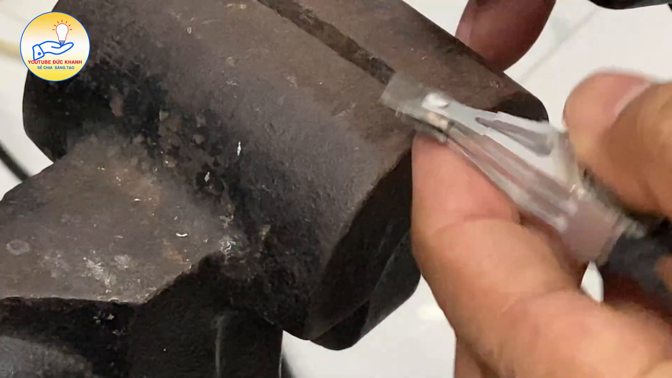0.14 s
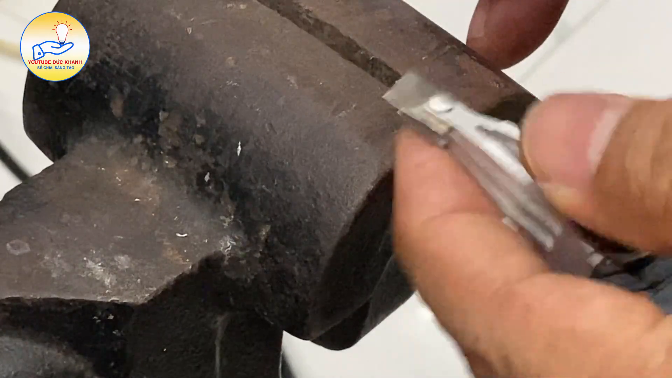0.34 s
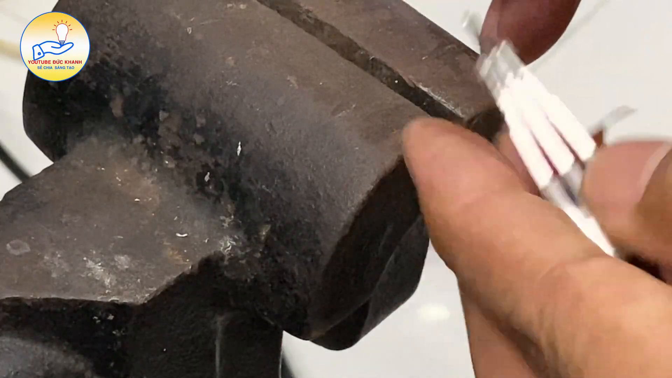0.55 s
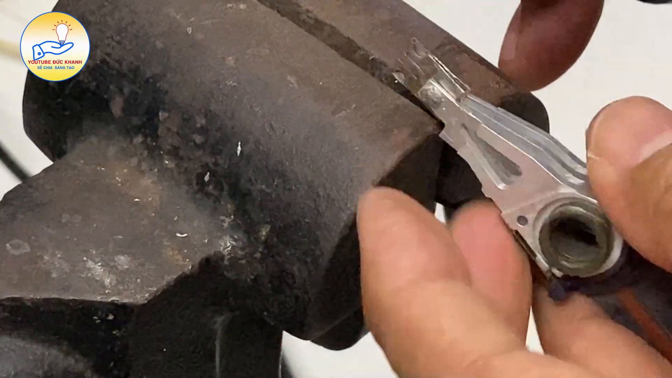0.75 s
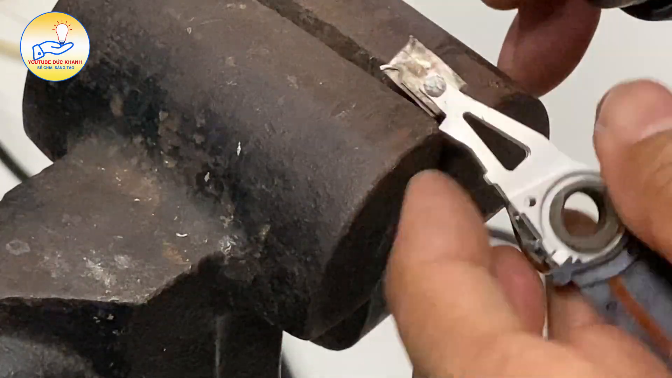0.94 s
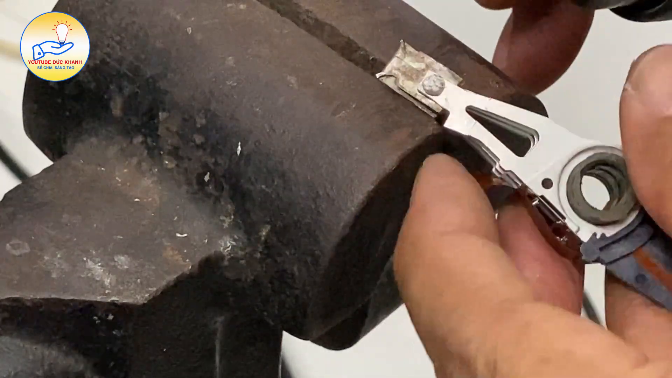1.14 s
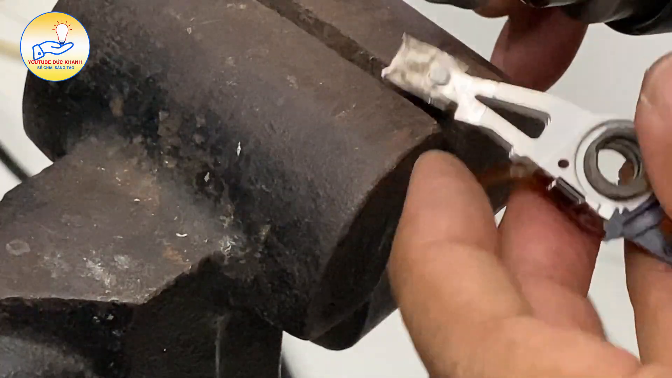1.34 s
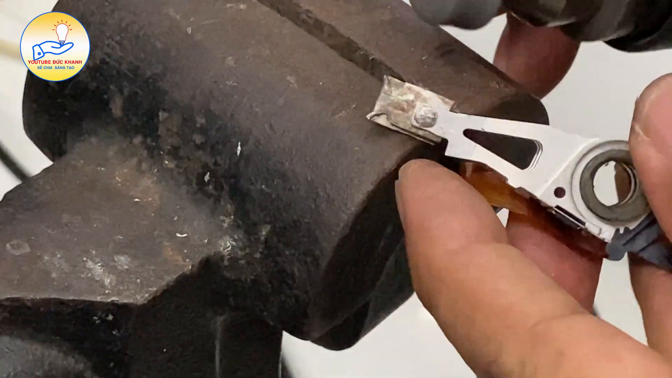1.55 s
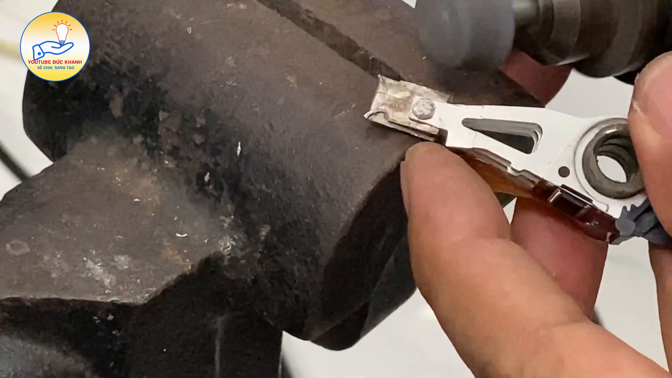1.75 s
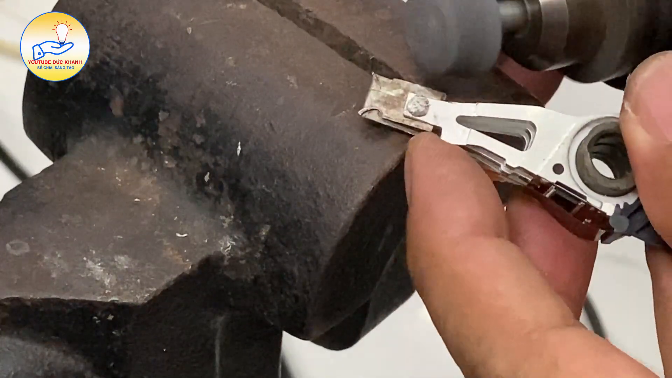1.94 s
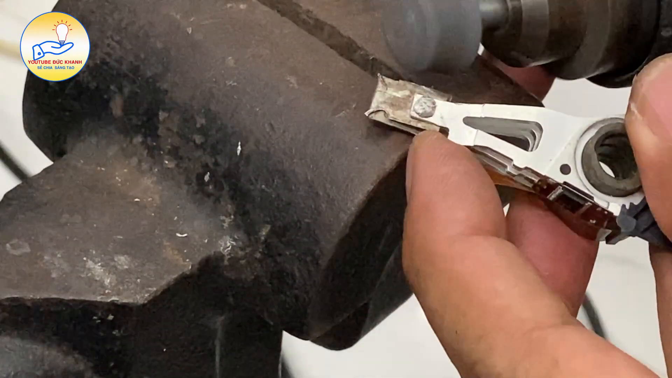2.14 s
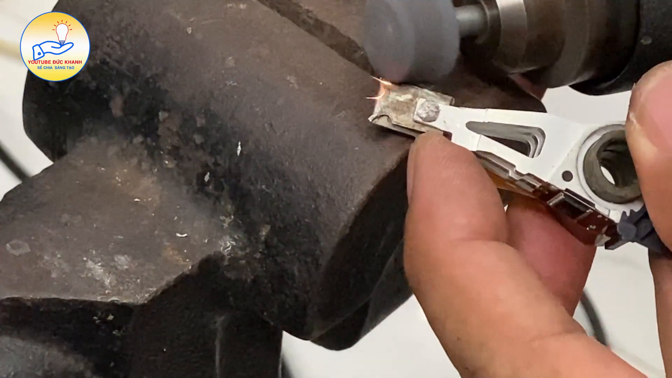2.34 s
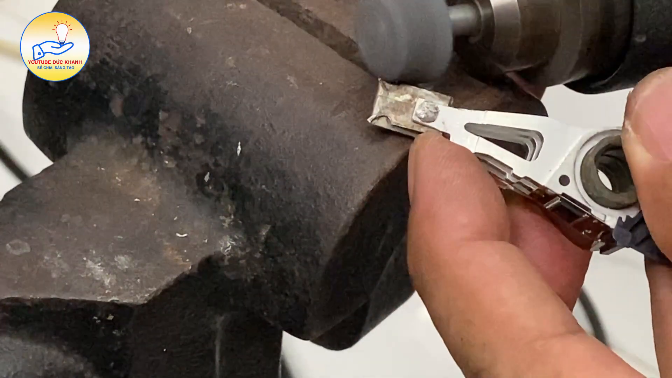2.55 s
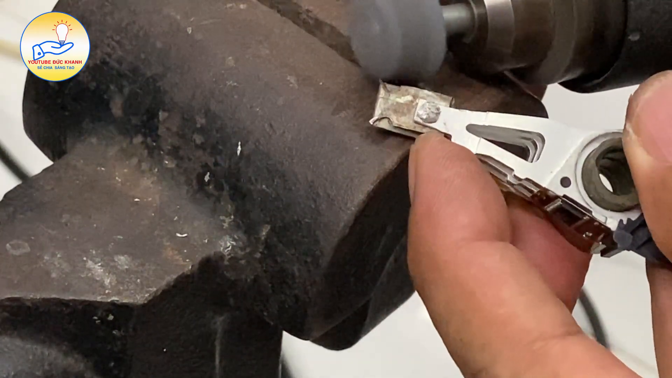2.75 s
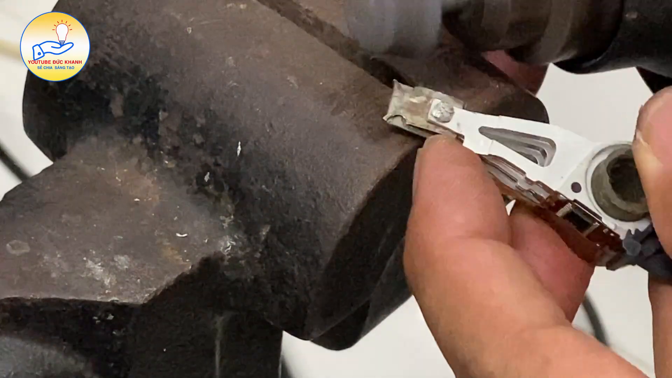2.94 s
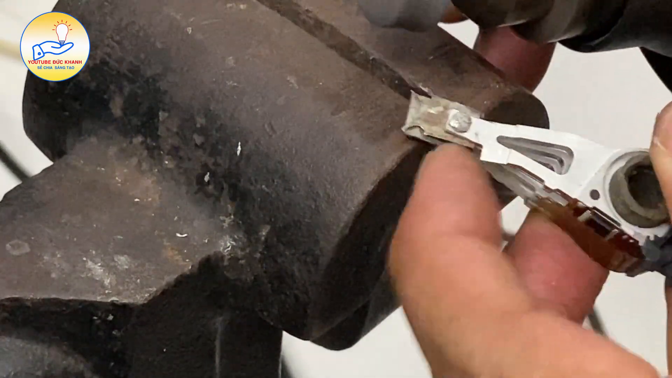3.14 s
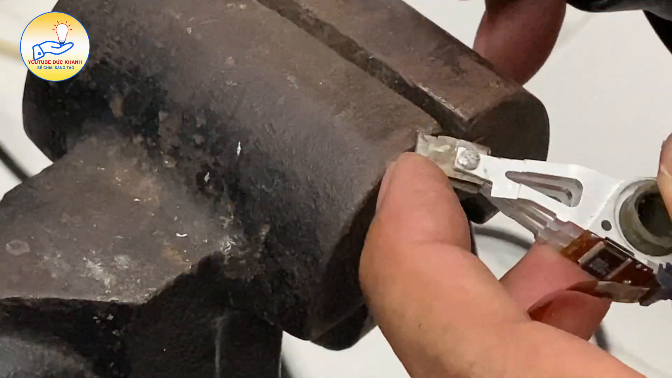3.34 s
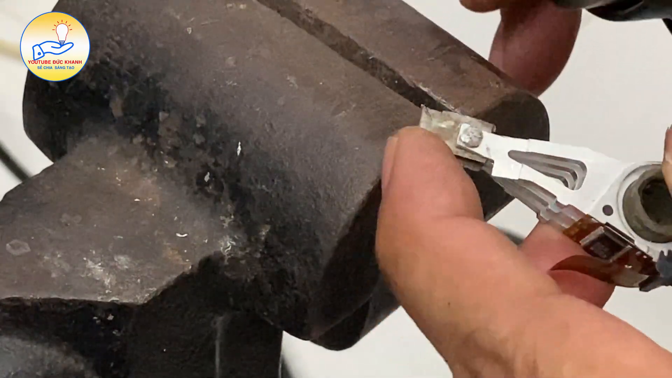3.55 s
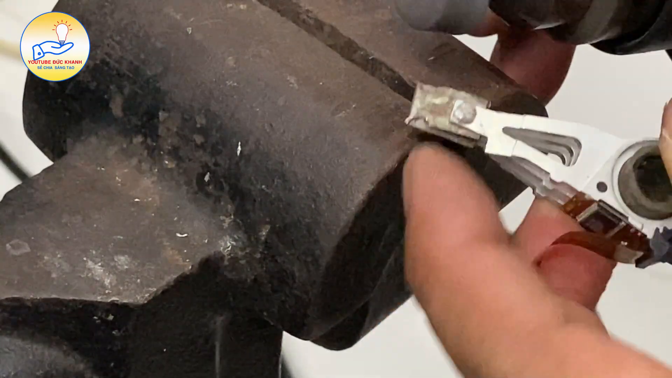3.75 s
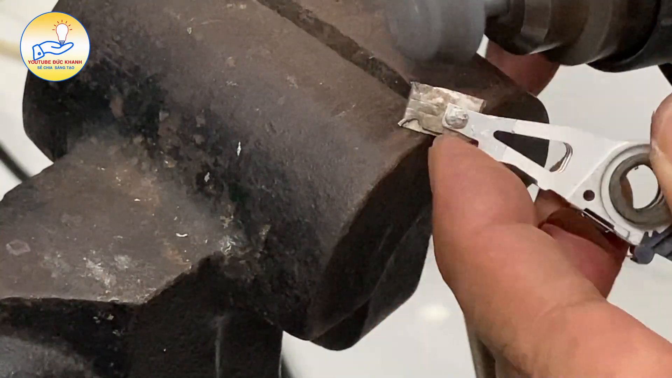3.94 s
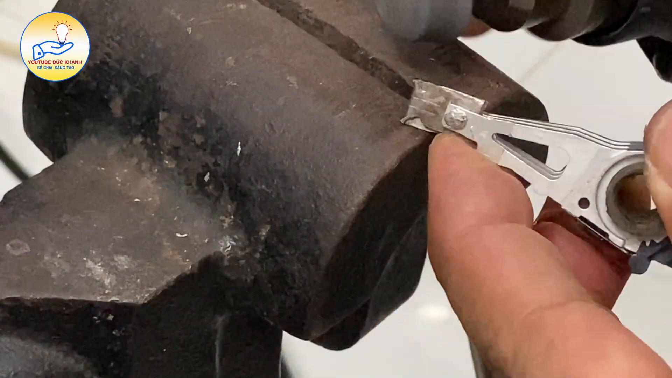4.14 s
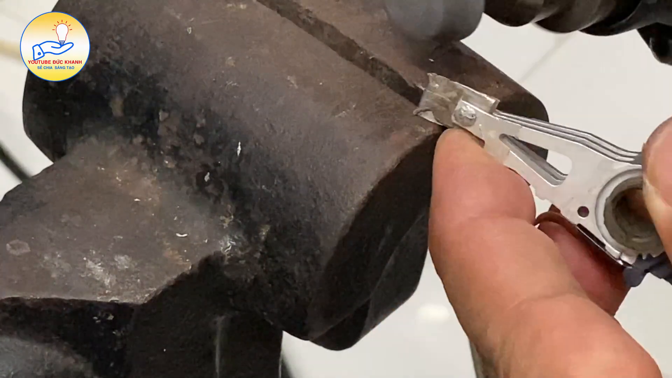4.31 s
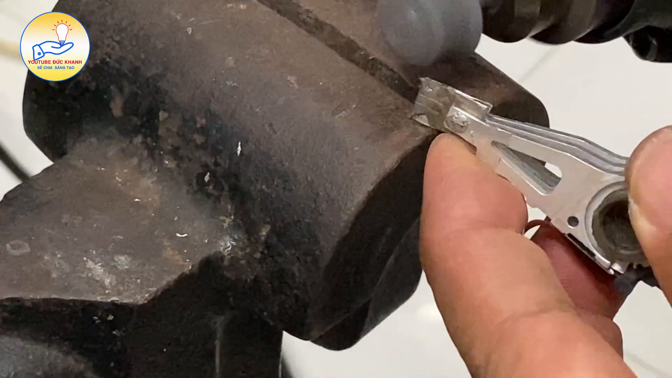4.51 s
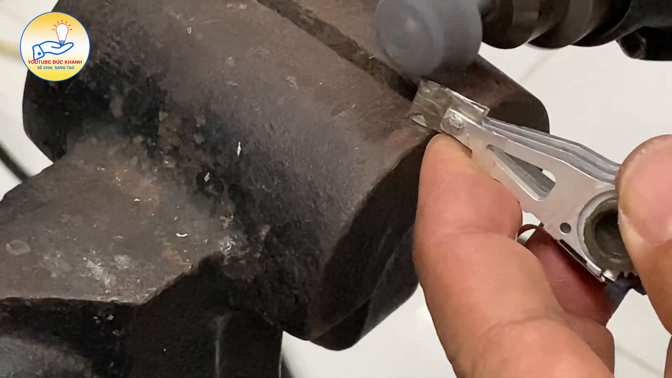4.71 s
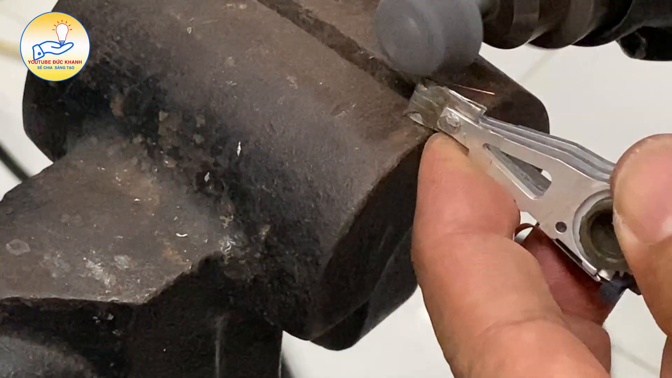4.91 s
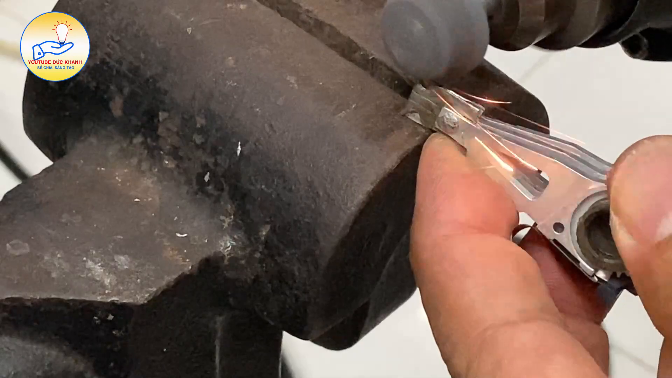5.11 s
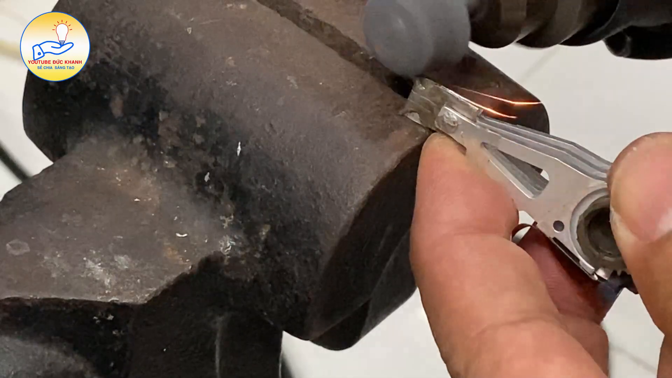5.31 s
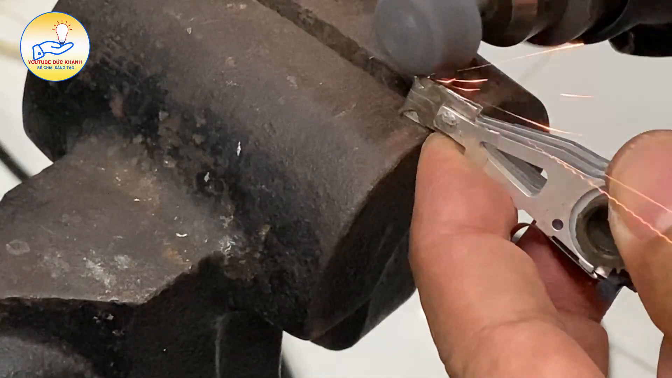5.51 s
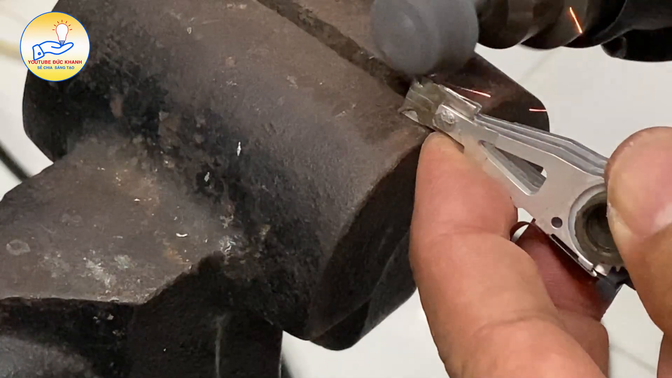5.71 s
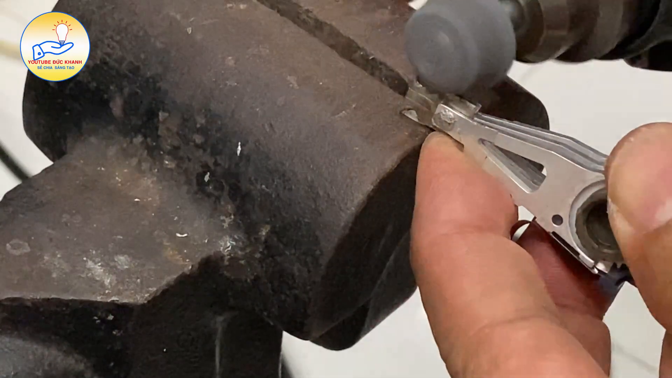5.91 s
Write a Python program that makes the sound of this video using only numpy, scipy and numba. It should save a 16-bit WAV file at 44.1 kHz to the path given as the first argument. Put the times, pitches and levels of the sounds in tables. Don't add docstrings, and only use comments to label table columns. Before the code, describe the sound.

A dying metallic scrape gives way to the rising, throbbing whine of a small mains rotary grinder with rushing fan air. Soft low bench thuds come near two seconds as light dabs of the stone chirp and rasp on thin metal. After a pause of bare motor, harder ringing dabs follow in quick succession. Close phone-like microphone, small workshop, short room tail.

```python
import sys
import numpy as np
from scipy import signal
from scipy.fft import rfft, irfft
from scipy.io import wavfile
from scipy.ndimage import uniform_filter1d, map_coordinates
from numba import njit

SR = 44100
rng = np.random.default_rng(int(sys.argv[2]) if len(sys.argv) > 2 else 0)


def put_to_file(sound):
    columns = np.atleast_2d(sound).T
    safe = np.clip(columns, -1, 1)
    whole_steps = np.round(safe * 32767)
    wavfile.write(sys.argv[1], SR, whole_steps.astype(np.int16))


def elevation(decibels):
    levels = np.asarray(decibels, float)
    return 10 ** (levels / 20)


N = 263277
TIME = np.arange(N) / SR
SLOTS = 12
PULL_HZ, PULL_PEAK_S = 100.2, 0.0083
KNOCK_FADE_S = 0.0068
REGRIP_S = [
    1.0,
    4.0,
    5.25,
    5.49,
]


def unit(x):
    return x / np.sqrt(np.mean(x ** 2))


def curve(table):
    seconds, values = np.transpose(table)
    return np.interp(TIME, seconds, values)


@njit
def svf(x, hz, width):
    y, b, l = np.empty(len(x)), 0., 0.
    for i in range(len(x)):
        g = np.tan(np.pi * hz[i] / SR)
        k = width[i] / hz[i]
        v = (b + g * (x[i] - l)) / (1 + g * (g + k))
        b = 2 * v - b
        l = l + 2 * g * v
        y[i] = k * v
    return y


def band(x, hz, width):
    return svf(x, np.full(N, 1. * hz), np.full(N, 1. * width))


def lift(x, modes):
    return x + sum((elevation(db) - 1) * band(x, hz, width) for hz, width, db in modes)


def walk(rate):
    hold = int(SR / rate)
    held = np.repeat(rng.standard_normal(N // hold + 1), hold)
    return 1.3 * uniform_filter1d(uniform_filter1d(held, hold), hold)[:N]


def air(air_db):
    # pitch_hz, level_db (per Hz)
    colour_points = [(18, -56), (30, -15.5), (256, -13.5), (316, -11), (360, -12), (506, -14), (790, -10.5),
                     (974, -1.5), (1170, -12.5), (1520, -2.5), (2140, -6.5), (3800, -7.5), (5060, -8.5),
                     (11700, -11), (15600, -14)]
    # pitch_hz, width_hz, level_db (over the air)
    housing = [(1007, 163, 7.5), (1417, 374, 8), (2357, 37, 6.5), (3780, 1080, 8.5)]
    hz = np.maximum(np.arange(N // 2 + 1) * SR / N, 1)
    point_hz, point_db = np.array(colour_points).T
    colour = elevation(np.interp(np.log(hz), np.log(point_hz), point_db))
    rush = irfft(rfft(rng.standard_normal(N)) * colour, N)
    rush = lift(rush, housing)
    shake = 1 + 0.038 * np.cos(2 * np.pi * PULL_HZ * (TIME - PULL_PEAK_S - .002))
    return unit(rush) * shake * elevation(air_db + 4.5 + 0.89 * walk(9.9))


def bumps():
    # start_s, level_db, pitch_hz, length_s
    thuds = [
        (1.687, -57, 70.0, 0.15),
        (1.868, -36, 83, 0.124),
        (1.983, -44, 64.6, 0.112),
        (2.277, -47, 89, 0.104),
        (2.43, -56.5, 84, 0.164),
        (5.127, -49.5, 87, 0.198),
    ]
    out = np.zeros(N)
    for start, db, hz, length in thuds:
        t = np.clip(TIME - start, 0, None) / length
        swell = 8 * t * np.exp(1 - 8 * t)
        out += elevation(db) * swell * np.sin(2 * np.pi * hz * length * t)
    return out


def slot_whine(turn, hz, near_db):
    # multiple of the pull rate, level_db
    throb = [
        (-2, -6),
        (-1, -1),
        (1, -1),
        (2, -7),
    ]
    tilt_s, tilt_takes_s, tilt_db = 5.5, .1, -7
    slot_db = -31.5 + 0.91 * near_db
    slot_db = slot_db + tilt_db / (1 + np.exp((tilt_s - TIME) / tilt_takes_s))
    below_db = slot_db - 9 - 2.5 * np.clip(hz - 318, 0, None) + walk(2.6)
    above_db = slot_db - 18.5 + 1.3 * np.abs(hz - 311)
    pull = 2 * np.pi * PULL_HZ * (TIME - PULL_PEAK_S)
    beat = elevation(slot_db)
    for k, db in throb:
        side_db = below_db if k < 0 else above_db
        beat = beat + elevation(db + side_db) * np.exp(1j * k * pull)
    return elevation(.5 * walk(12)) * np.real(beat * np.exp(2j * np.pi * SLOTS * turn))


def shaft_tones(turn, hz, near_db):
    # multiple of the shaft speed, level_db
    tones = [(1, -20), (2, -30), (3, -19), (6, -26), (11, -15), (13, -24), (14, -21), (15, -18), (16, -14),
             (19, -26), (20, -18), (21, -21), (22, -24), (23, -24), (24, -9), (25, -20), (26, -25),
             (27, -23), (28, -15), (29, -16), (30, -22), (31, -26), (32, -21), (34, -23), (35, -23),
             (36, -13), (37, -18), (39, -25), (40, -23), (43, -26), (44, -26), (48, -21)]
    rise = {1: 0.09, 16: -0.26, 24: 0.32, 28: 0.2, 36: 0.08, 48: -0.43}
    usual_hz = 316
    out = 0
    for k, db in tones:
        waver_db = min(k / 8, 1.4) * walk(6) + rise.get(k, 0) * (hz - usual_hz)
        out = out + elevation(db + waver_db) * np.cos(2 * np.pi * (k * turn + rng.random()))
    return elevation(-32 + near_db) * out


def whine(turn, hz, near_db):
    return np.sqrt(2) * (slot_whine(turn, hz, near_db) + shaft_tones(turn, hz, near_db))


def stone(turn):
    cells = 140
    fresh = rng.standard_normal((int(turn[-1]) + 2, cells))
    rim = signal.lfilter([1], [1, -.94], fresh, axis=0)
    angle = turn % 1
    bite = np.exp(-angle / .4)
    held = map_coordinates(rim, [np.floor(turn), angle * (cells - 1)], order=3)
    snap = 0
    for k in range(18, 51):
        snap = snap - elevation(3.0 * walk(25)) * np.cos(2 * np.pi * (k * turn + .15 * walk(3)))
    held = unit(unit(bite * held) + 1.1 * unit(snap))
    loose = unit(bite * rng.standard_normal(N))
    return held, loose


def dabs(hz):
    # start_s, length_s, ring_db, main_mode_hz, grit_db
    early_dabs = [(-.012, 0.028, -18.5, 3600, -35.5), (2.249, .022, -25, 3440, -32.5),
                  (2.336, 0.029, -15.5, 3610, -32), (2.363, 0.068, -25.5, 3440, -29),
                  (2.423, 0.051, -21.5, 3640, -27.5), (2.468, 0.11, -22.5, 3700, -29.5),
                  (2.579, 0.061, -18.5, 3920, -27.5), (2.647, 0.029, -28, 3500, -29),
                  (2.676, 0.057, -20.5, 3900, -26), (2.741, 0.052, -32, 3780, -29),
                  (2.796, 0.032, -26, 3780, -32.5)]
    # start_s, length_s, ring_db, main_mode_hz, grit_db
    late_dabs = [(4.637, 0.021, -24.5, 3520, -30), (4.695, 0.042, -28.5, 3520, -35),
                 (4.747, .08, -39.5, 3520, -60), (4.914, 0.0095, -25, 3520, -32),
                 (4.925, 0.12, -25, 3510, -38.5), (5.043, 0.095, -28.5, 3560, -39),
                 (5.13, 0.086, -18.5, 3540, -35.5), (5.214, .04, -30, 3470, -36),
                 (5.255, 0.037, -22.5, 3470, -39), (5.298, 0.085, -27.5, 3480, -40),
                 (5.377, .11, -21.5, 3560, -34.5), (5.489, 0.052, -16, 3614, -35),
                 (5.563, 0.016, -16.5, 3620, -45), (5.591, 0.023, -25, 3690, -39),
                 (5.669, 0.048, -23, 3640, -35.5), (5.73, 0.026, -29, 3660, -43),
                 (5.748, 0.085, -21.5, 3600, -47), (5.843, 0.033, -19.5, 3670, -33),
                 (5.882, 0.028, -24, 3630, -38), (5.909, .03, -20, 3650, -51),
                 (5.95, 0.036, -33, 3650, -55)]
    lifted_s = .058
    land_s, swell, release_s = .006, 0.37, 0.013
    mode_width_hz = 240
    multiples = np.arange(SLOTS - 1, SLOTS + 2)[:, None]
    grit_share = np.array([[0.25], [0.66], [1]])
    main, scrape, knock, ended = np.zeros((3, N)), np.zeros((3, N)), np.zeros(N), 0
    for start, length, ring_db, mode_hz, grit_db in early_dabs + late_dabs:
        lands = start - ended > lifted_s or start < 0
        ended = start + length
        t = TIME - start
        rise = np.clip(t / (land_s if lands else swell * length), 0, 1)
        shape = rise * np.exp(-np.clip(t - length, 0, None) / release_s)
        detune = 2 * (multiples * hz - mode_hz) / mode_width_hz
        main += elevation(ring_db) * shape / (1 + detune ** 2)
        scrape += elevation(ring_db + (grit_db - ring_db) * grit_share) * shape
        knock += lands * elevation(grit_db) * rise * np.exp(-np.clip(t, 0, None) / KNOCK_FADE_S)
    return main, scrape, knock


def chatter():
    # start_s, length_s, level_db
    bouts = [
        (4.917, 0.028, -20),
        (5.113, 0.083, -33),
    ]
    bounce = np.cumsum(88 * (1 + 0.24 * walk(60))) / SR % 1
    gate = 2 * uniform_filter1d(np.exp(-bounce / 0.32), size=60)
    size = 0
    for start, length, db in bouts:
        progress = np.clip((TIME - start) / length, 0, 1)
        size = size + elevation(db) * np.sqrt(np.sin(np.pi * progress).clip(0))
    return gate * size


def ring(turn, loose, main, scrape, stray):
    # multiple of the turn, then level_db in each of five grips
    grips = [(3, -25, -25, -25, -18, -14), (4, -25, -25, -25, -18, -14), (5, -25, -22, -16, -16, -18),
             (6, -18, -19, -14, -17, -20), (7, -4, -17, -12, -15, -8), (8, -9, -16, -20, -19, -23),
             (9, -18, -9, -15, -9, -17), (10, -13, -14, -25, -12, -20), (13, -11, -4, -2, 0, -6),
             (14, -8, -7, -4, -7, -1), (15, -8, -8, -9, -13, -12), (16, -13, -10, -11, -13, -13),
             (17, -15, -9, -10, -7, -7), (18, -16, -13, -11, -7, -17), (19, -21, -8, -17, -15, -15)]
    main_tones = 0
    for k, size in enumerate(main, start=SLOTS - 1):
        main_tones = main_tones + size * elevation(walk(60)) * np.sin(2 * np.pi * k * turn)
    grip = np.searchsorted(REGRIP_S, TIME)
    other_tones = 0
    for k, *dbs in grips:
        level = elevation(np.array(dbs)[grip] + 3.3 * walk(28))
        phase = k * turn + rng.random() + .06 * walk(70)
        other_tones = other_tones + level * np.sin(2 * np.pi * phase)
    mode = unit(band(band(loose, 3620, 190), 3620, 190))
    around = unit(band(band(loose, 3700, 3000), 3700, 3000))
    clang = mode + elevation(-7) * around
    return np.sqrt(2) * (main_tones + scrape * other_tones) + stray * clang


def landing_ding(loose, knock):
    ding = signal.lfilter([1 / (KNOCK_FADE_S * SR)], [1, -np.exp(-1 / (.035 * SR))], knock)
    return elevation(3) * ding * unit(band(loose, 2100, 60))


def grit_rasp(held, loose, sizes, knock):
    # pitch_hz, width_hz, level_db
    part = [(7400, 700, 0), (9100, 800, 1), (10800, 700, -2), (12600, 1100, 1), (14200, 1100, 0)]
    # low_edge_hz, high_edge_hz
    rasp_bands = [
        (5600, 9600),
        (9600, 16500),
    ]
    share = np.clip(.13 * (1 + 0.54 * walk(20)), 0, 1)
    grit = np.sqrt(1 - share) * held + np.sqrt(share) * loose
    grit = grit + sum(elevation(db + 5.5 * walk(18)) * band(grit, hz, width) for hz, width, db in part)
    out = 0
    for size, edges in zip(sizes, rasp_bands):
        rasp = signal.sosfiltfilt(signal.butter(2, edges, "band", fs=SR, output="sos"), grit)
        even = rasp / np.sqrt(uniform_filter1d(rasp ** 2, size=1400))
        flecks = elevation(1.2 * walk(30))
        out = out + (size + elevation(-1.5) * knock) * flecks * even
    return out


def grind(turn, hz):
    # other_tones_db, middle_rasp_db, loose_clang_db
    grip_levels = [
        (-4, 0, -9),
        (-8.5, -4.5, -10.5),
        (-8.5, -11.5, -8),
        (-7, -11, -20),
        (-6.5, -5, -9),
    ]
    held, loose = stone(turn)
    main, (other, middle, high), knock = dabs(hz)
    grip = np.searchsorted(REGRIP_S, TIME)
    other_gain, middle_gain, clang_gain = elevation(np.array(grip_levels)[grip].T)
    stray = clang_gain * other + elevation(3) * knock + chatter()
    ringing = ring(turn, loose, main, other_gain * other, stray)
    rasp = grit_rasp(held, loose, (middle_gain * middle, high), knock)
    return ringing + landing_ding(loose, knock) + rasp


def scene():
    # time_s, speed_hz (turns per second)
    speed = [(0, 299.7), (.25, 303.5), (.6, 308.4), (1, 312.5), (1.6, 316.6), (2.3, 319.1), (2.76, 314.8),
             (2.9, 314.9), (3.5, 317.7), (4.1, 319.6), (4.62, 320.4), (4.92, 319.5), (5.1, 317.6),
             (5.42, 312.4), (5.5, 308.9), (5.64, 307.0), (5.77, 306.8), (5.97, 304.1)]
    # time_s, nearness_db
    near = [(0, -2), (.15, -4), (.32, -2.5), (.4, -1.4), (1.1, 0.04), (1.5, 0.6), (2.2, 1.4), (2.7, 0.8),
            (2.9, -2.3), (3.25, -0.2), (3.5, -2.5), (4, 0.45), (4.5, 0.4), (5.1, 1.1), (5.5, 0.1),
            (5.65, -4.5), (5.8, -2), (5.97, -3.5)]
    hz = curve(speed)
    turn = np.cumsum(hz) / SR
    near_db = curve(near)
    grinding = grind(turn, hz)
    tail = rng.standard_normal(6000) * elevation(-60 * TIME[:6000] / 0.8)
    room = elevation(-44) * signal.fftconvolve(grinding, tail)[:N]
    motor = whine(turn, hz, near_db) + air(-36 + near_db)
    return (motor + grinding + room + bumps())[None]


def roll_off(x):
    return signal.sosfilt(signal.butter(12, 16550, fs=SR, output="sos"), x)


def record(dry):
    no_bass = signal.sosfilt(signal.butter(4, 48, "high", fs=SR, output="sos"), dry)
    mix = signal.sosfiltfilt(signal.ellip(10, .1, 60, 15740, fs=SR, output="sos"), no_bass)
    return roll_off(mix)


dry = scene()
out = record(dry)
put_to_file(out)
```